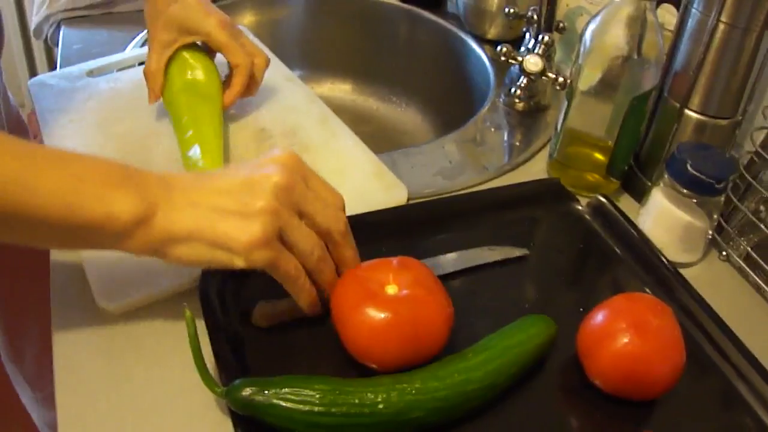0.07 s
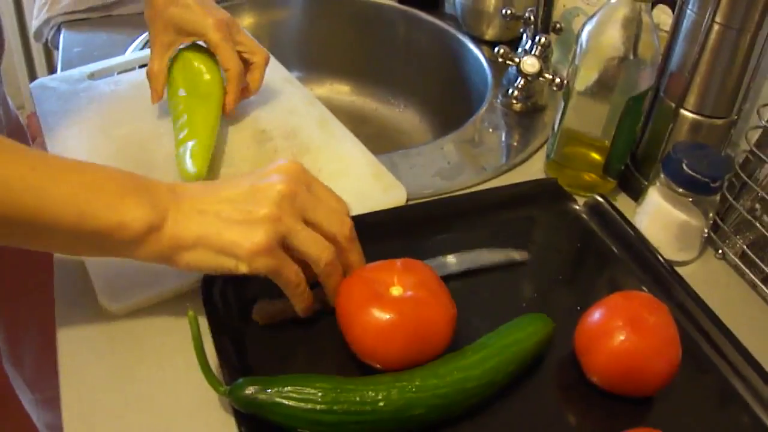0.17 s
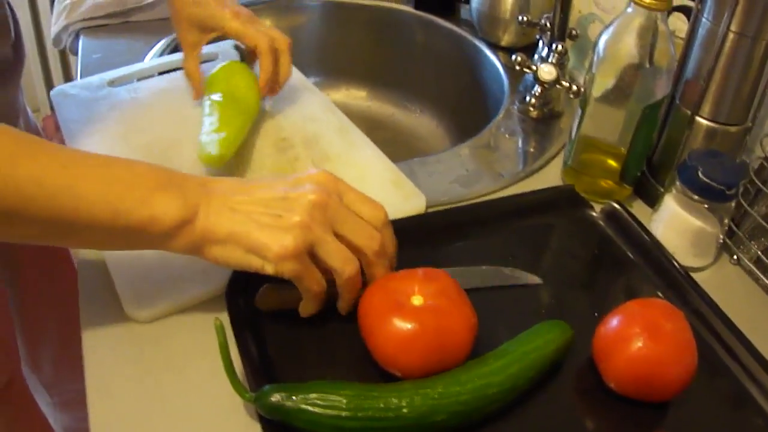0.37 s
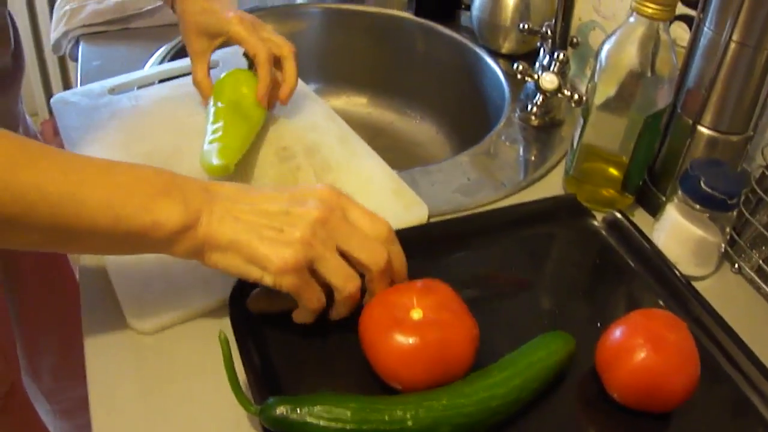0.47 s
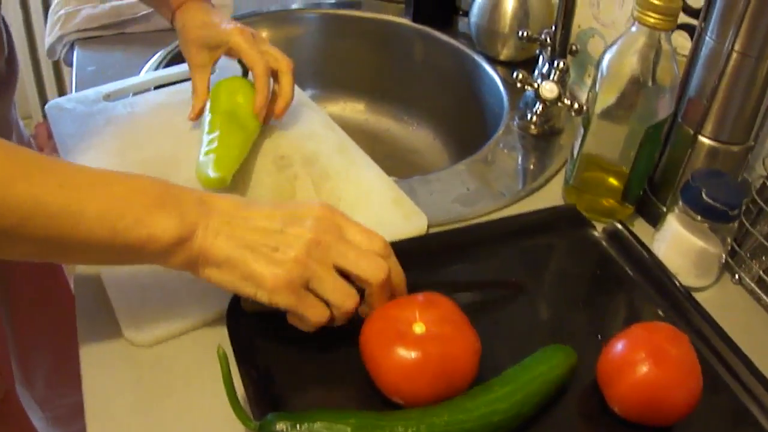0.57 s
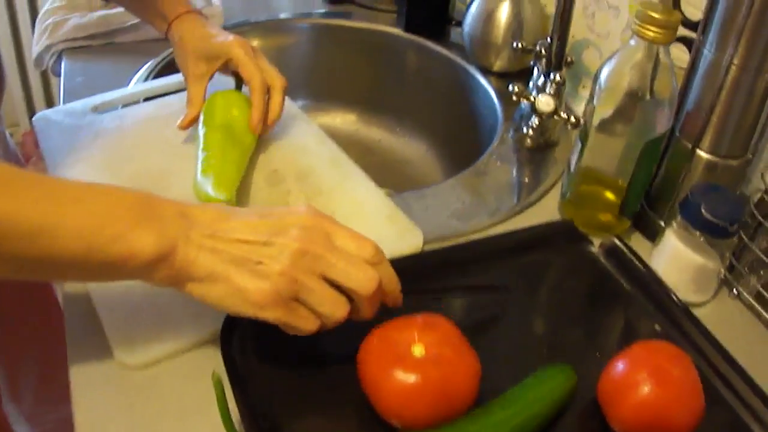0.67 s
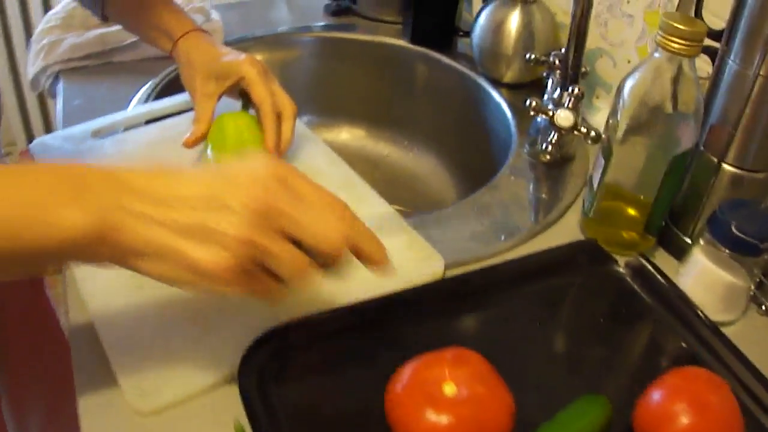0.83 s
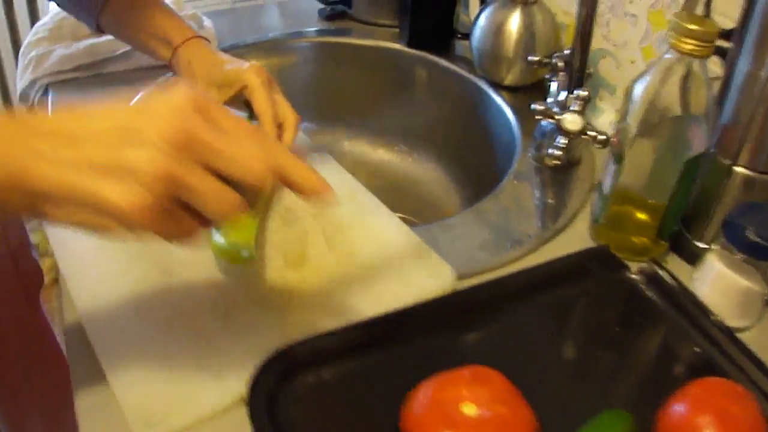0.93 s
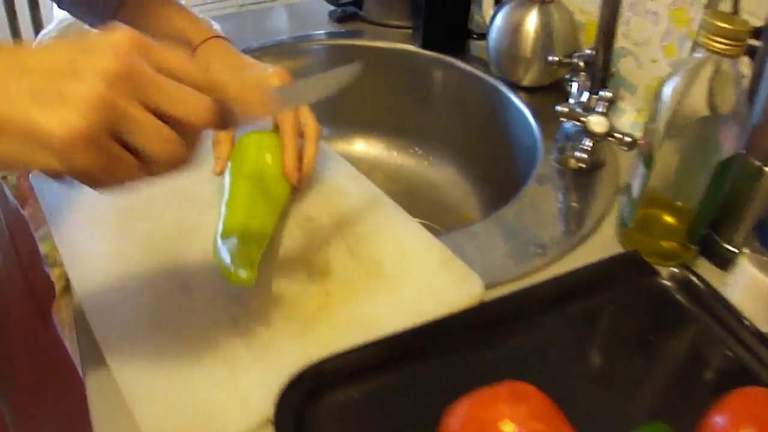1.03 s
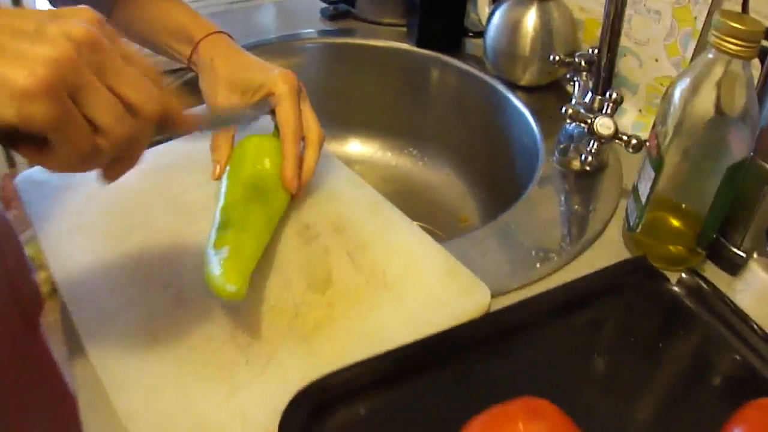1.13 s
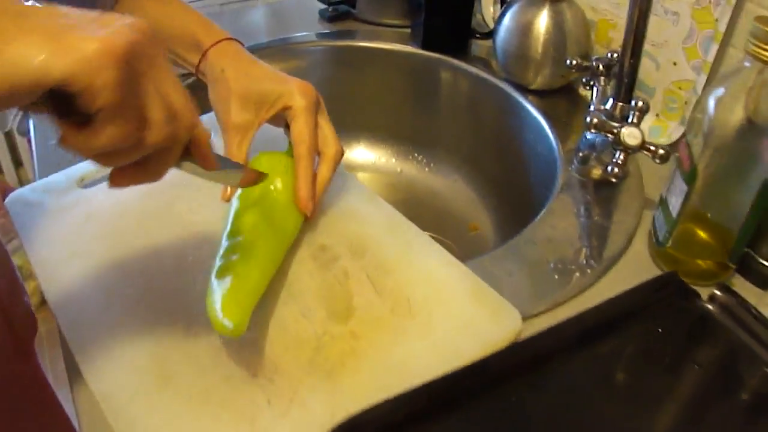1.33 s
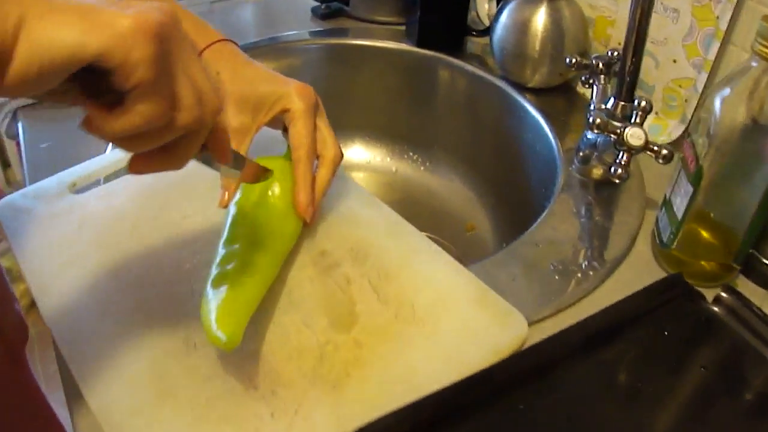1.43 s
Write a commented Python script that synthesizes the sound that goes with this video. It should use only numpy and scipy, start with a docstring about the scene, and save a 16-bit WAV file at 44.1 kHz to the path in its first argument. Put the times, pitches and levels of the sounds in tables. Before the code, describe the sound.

A small knife is picked up from a baking tray, close by in a quiet kitchen. The handle knocks, then the blade clinks, scrapes and rattles off the rim. A soft tap and a pepper sliding on a cutting board follow.

```python
"""A small kitchen knife is picked up from a baking tray, close by, in a quiet kitchen.
The hand bumps and rubs the tray; the handle knocks on it (0.24 s), skids and ticks.
The blade clinks (0.5 s), drags and squeaks by stick-slip, its ring changing as the grip closes,
then rattles off the rim (0.67-0.8 s). A soft tap (1.13 s) and a short slide of a pepper on the
cutting board follow. Steady air noise and faint appliance tones run throughout."""
import sys
import numpy as np
from scipy import signal
from scipy.fft import rfft, irfft
from scipy.io import wavfile
from scipy.ndimage import uniform_filter1d

SR = 44100
rng = np.random.default_rng(int(sys.argv[2]) if len(sys.argv) > 2 else 0)


def bounce(signal):
    """Save signal as a 16-bit WAV file at the path given by the first command-line argument."""
    frames = np.transpose(np.atleast_2d(signal))
    limited = np.clip(frames, -1, 1)
    pcm = np.round(limited * 32767).astype(np.int16)
    wavfile.write(sys.argv[1], SR, pcm)


N = 66150


def knife_handle():
    """Handle knocks ring the tray; the shifting handle ticks in its own modes."""
    # contacts (time [s], level [dB], tilt [dB/octave])
    knocks = [(.2322, -40.5, -2.5), (.2388, -15.5, -0.2), (.2408, -23, 2), (.2450, -32, -3)]
    ticks = [(.2836, -26.5, 3), (.2946, -40, 10.5), (.2963, -38, 10), (.3595, -35, 4), (.3622, -35.5, -1.5),
             (.3650, -37, 2.5)]
    # modes (frequency [Hz], level [dB], t60 [s])
    tray_modes = [(726, -6.5, 0.083), (866, -4, 0.047), (1250, -3, 0.025), (1667, -7, 0.1),
                  (2400, -7.5, 0.037), (2704, -2, 0.041), (3196, -0.5, 0.027), (3630, -2, 0.02),
                  (4380, -4, 0.005), (5680, -0.5, 0.017), (8400, -12, 0.011), (10550, -17, 0.013)]
    handle_modes = [(3270, 4, 0.016), (3588, 3.5, 0.048), (4040, -4, 0.0078), (5950, -11, 0.0096)]
    tray = body(tray_modes, crack_db=-6, crack_t60_s=0.037)
    handle = body(handle_modes, crack_db=2, crack_t60_s=0.023)
    return strike(knocks, tray) + strike(ticks, handle)


def knife_blade():
    """Contacts and friction ring the blade: loose, pinched in the fingers, then tip on the rim."""
    # modes per state (frequency [Hz], level [dB], t60 [s])
    loose_modes = [(950, -2.5, 0.011), (1488, 2, 0.097), (1707, 4, 0.077), (2483, -14, 0.081),
                   (2716, -7.5, 0.12), (3050, -9, 0.12), (3460, -7, .09), (3800, 6.5, 0.027),
                   (5530, -2.5, 0.052), (5862, 5, 0.028), (7250, -8.5, 0.072), (7740, -3, 0.035),
                   (8880, -4, 0.081), (9360, -3.5, 0.015)]
    pinched_modes = [(848, -16, 0.054), (1297, -10, .07), (1773, -5, 0.033), (2326, -4.5, 0.038),
                     (2472, -2, 0.029), (2740, -10.5, 0.049), (3210, -10.5, .04), (3380, -9.5, .06),
                     (3555, -5.5, 0.051), (4900, -6, 0.027), (5490, -7, 0.02), (8800, -14, 0.0045),
                     (10190, -14, 0.019)]
    tip_modes = [(770, -6.5, 0.016), (950, -5, 0.043), (1188, -9.5, 0.034), (1815, -8, .03),
                 (1945, -2.5, 0.04), (2234, -1, 0.029), (2370, -4.5, 0.04), (2638, 1, 0.03),
                 (2975, -1, 0.016), (3570, -5, 0.021), (4150, -11, 0.022), (4947, -6.5, 0.032),
                 (5440, -9, 0.025), (5930, -9.5, 0.0084)]
    # contacts (time [s], level [dB], tilt [dB/octave])
    clinks = [(.4950, -20, 2), (.4962, -25, 0.5), (.4995, -24, -2), (.5572, -34, 4.5)]
    rim_rattles = [(.6700, -34, 4), (.7203, -30, 3), (.7622, -29, -0.5), (.7703, -22, 2), (.7738, -34, -6),
                   (.7825, -25.5, -0.5)]
    # drags (start [s], peak [s], end [s], level [dB], tilt [dB/octave], state [0 loose, 1 pinched, 2 tip])
    strokes = [(0.534, 0.558, 0.6, -34, 1.5, 0), (0.557, 0.59, 0.62, -26.5, 2.5, 1),
               (0.589, 0.599, 0.626, -23.5, -3.5, 1), (0.643, 0.682, 0.807, -32, 5.5, 2),
               (0.667, 0.716, 0.798, -31, -2, 2), (0.74, .779, 0.8, -26, 5, 2)]
    loose = body(loose_modes, crack_db=-7, crack_t60_s=0.037)
    pinched = body(pinched_modes, crack_db=-8.5, crack_t60_s=0.011)
    tip = body(tip_modes, crack_db=-11, crack_t60_s=0.02)
    out = strike(clinks, loose) + strike(rim_rattles, tip)
    for start, peak, end, db, tilt_db, state in strokes:
        drag = tilt(friction(), tilt_db) * swell(start, peak, end, db)
        out += convolve(drag, (loose, pinched, tip)[state])
    return out


def blade_squeaks():
    """Stick-slip: the dragging blade locks onto one mode for a moment."""
    # (start [s], peak [s], end [s], level [dB], pitch [Hz])
    squeaks = [(0.552, 0.562, 0.57, -28.5, 5630), (0.552, 0.559, 0.564, -35, 9040),
               (0.578, 0.591, 0.61, -28.5, 2450), (0.661, 0.684, 0.686, -31, 4850),
               (0.688, 0.719, 0.756, -22.5, 2048), (0.763, 0.774, 0.782, -29, 1215),
               (0.568, .582, .605, -39.5, 10300), (0.705, 0.729, 0.754, -41, 515),
               (0.743, 0.766, 0.77, -40, 482)]
    pitch_waver, flutter_db = 0.003, 1.4
    out = np.zeros(N)
    for start, peak, end, db, hz in squeaks:
        phase = 2 * np.pi * np.cumsum(hz * (1 + pitch_waver * walk(160))) / SR
        gain = swell(start, peak, end, db) * undb(flutter_db * walk(250))
        out += np.sqrt(2) * np.sin(phase) * gain
    return out


def tray_rubbing():
    """Fingers and handle rub along the tray; the handle skids after its knock."""
    # (time [s], level [dB])
    rub_levels = [(0, -81), (.13, -55), (.23, -49.5), (.255, -39), (.31, -40.5), (.40, -41.5), (.48, -41),
                  (.63, -44.5), (.80, -47), (.88, -55)]
    # (start [s], peak [s], end [s], level [dB])
    skid_swell = (.244, 0.2652, 0.3245, -29)
    # spectra (frequency [Hz], gain [dB])
    rub_colour = [(60, -30), (200, -12.5), (600, 0.5), (1200, 1), (2200, -4.5), (3500, -4.5), (5000, -9),
                  (7000, -11.5), (11000, -19.5)]
    skid_colour = [(400, -16), (900, 0.5), (1500, -1), (2200, -3), (3500, -3), (4800, -13), (7000, -20),
                   (11000, -24)]
    rub = unit(colour(friction(), rub_colour)) * curve(rub_levels)
    skid = unit(colour(friction(), skid_colour)) * swell(*skid_swell)
    return rub + skid


def tray_rumble():
    """Friction under the hand drives the tray floor's low modes; soft bumps add dull thuds."""
    # swells (start [s], peak [s], end [s], level [dB])
    rumbles = [(0.23, 0.309, 0.4, -39), (0.575, 0.595, 0.63, -36), (0.609, 0.625, 0.63, -39),
               (0.627, 0.664, 0.725, -34.5)]
    bumps = [(0.054, 0.094, 0.23, -51.5), (0.178, 0.203, 0.245, -43), (0.612, 0.632, 0.72, -46.5)]
    # (frequency [Hz], level [dB], t60 [s])
    floor_modes = [(195, -9.5, 0.034), (299.8, 1, 0.1), (399, -2, 0.07), (544, -3, 0.04),
                   (772, -1.5, 0.066)]
    # (frequency [Hz], gain [dB])
    bump_colour = [(50, -26), (90, -14), (115, -2.5), (160, -24), (220, 1.5), (400, -24), (2000, -53)]
    drive = friction() * sum(swell(*row) for row in rumbles)
    rumble = convolve(drive, body(floor_modes, crack_db=-27, crack_t60_s=0.02))
    thuds = noise(bump_colour) * sum(swell(*row) for row in bumps)
    return rumble + thuds


def pepper_on_board():
    """A soft tap rings the cutting board; the pepper slides with a short hiss."""
    # (time [s], level [dB], tilt [dB/octave])
    taps = [(1.1285, -35, 1.5)]
    # (frequency [Hz], level [dB], t60 [s])
    board_modes = [(398, -3.5, 0.016), (824, -0.5, 0.03), (1050, -1, 0.018), (1228, 1, .04),
                   (2100, -9, .003)]
    # (time [s], level [dB])
    slide_levels = [(1.255, -58), (1.275, -44.5), (1.295, -43), (1.325, -44), (1.345, -51.5), (1.42, -60)]
    # (frequency [Hz], gain [dB])
    slide_colour = [(80, -30), (400, -7), (900, -16), (1250, 7), (1700, -16), (2350, 2.5), (2900, -7.5),
                    (3800, -5.5), (5000, -13.5), (6200, -9), (11000, -27)]
    board = body(board_modes, crack_db=-15.5, crack_t60_s=0.015)
    return strike(taps, board) + noise(slide_colour) * curve(slide_levels)


def kitchen_reverb(x):
    """Add the short reverberation of a small hard room."""
    # (frequency [Hz], gain [dB])
    tail_colour = [(100, -3), (1200, 1.5), (3000, -2.5), (6000, -8.5), (11000, -3.5)]
    t60_s, tail_db, delay_s = 0.22, -8.5, 0.009
    late_s = clock() - delay_s
    tail = colour(rng.standard_normal(N), tail_colour)
    decay = (late_s > 0) * np.exp(-np.log(1000) * np.abs(late_s) / t60_s)
    return x + undb(tail_db) * convolve(x, tail * unit(decay) / np.sqrt(N))


def room_noise():
    """Steady air noise with faint, wavering appliance tones."""
    # (frequency [Hz], gain [dB])
    air_colour = [(15, -67), (25, -40), (58, -21), (81, -11.5), (134, -9), (169, -3), (274, -3.5),
                  (311, -4), (433, -4), (721, -5), (1060, -5), (1950, -11), (2580, -13), (11000, -24.5),
                  (14300, -74), (22000, -120)]
    # (frequency [Hz], level [dB])
    appliance_tones = [(301.5, -59.5), (1244, -68), (7870, -67)]
    air_db, waver_rad = -47.5, 1.7
    hum = np.zeros(N)
    for hz, db in appliance_tones:
        hum += undb(db) * np.sqrt(2) * np.sin(2 * np.pi * hz * clock() + waver_rad * walk(32))
    return undb(air_db) * noise(air_colour) + hum


def body(modes, crack_db, crack_t60_s):
    """Impulse response, energy 1: ringing modes plus a short crack of dense high modes."""
    # (frequency [Hz], gain [dB])
    crack_colour = [(100, -23), (300, -10), (700, -2), (2000, 3), (3500, 7), (5800, 0), (7000, -3.5),
                    (11000, -10.5)]
    radiation_hz = 130  # small bodies radiate little below this
    t = clock()
    fade = lambda t60: np.exp(-np.log(1000) * t / t60) / np.sqrt(t60)
    ring = np.zeros(N)
    for k, (hz, db, t60) in enumerate(modes):
        ring += (-1) ** k * undb(db) * fade(t60) * np.sin(2 * np.pi * hz * t)
    ring = highpass(ring, radiation_hz)
    crack = noise(crack_colour) * fade(crack_t60_s)
    return unit(unit(ring) + undb(crack_db) * unit(crack)) / np.sqrt(N)


def strike(contacts, response, span_s=0.005):
    """Impulses ring a body; level is the rms over span_s, before tilt."""
    force = np.zeros(N)
    for at_s, db, tilt_db in contacts:
        push = np.zeros(N)
        push[int(at_s * SR)] = undb(db) * np.sqrt(span_s * SR)
        force += tilt(push, tilt_db)
    return convolve(force, response)


def friction(catches_per_s=3000, spread_db=1):
    """Dense, uneven little catches on the tray, rms 1."""
    catches = rng.random(N) < catches_per_s / SR
    sign = rng.choice([-1, 1], N)
    strength = undb(spread_db * np.minimum(rng.exponential(size=N), 4))
    return unit(catches * sign * strength)


def undb(db):
    return 10 ** (np.asarray(db) / 20)


def unit(x):
    """Scale to rms 1."""
    return x / np.sqrt(np.mean(x ** 2))


def clock():
    """Sample times [s]."""
    return np.arange(N) / SR


def colour(x, points):
    """Filter by (frequency [Hz], gain [dB]) points."""
    hz, db = np.array(points).T
    bins_hz = np.maximum(np.fft.rfftfreq(2 * N, 1 / SR), 1)
    gain = undb(np.interp(np.log(bins_hz), np.log(hz), db))
    return irfft(rfft(x, 2 * N) * gain)[:N]


def tilt(x, db_per_octave):
    """Slope the spectrum two octaves either side of 3200 Hz."""
    return colour(x, [(800, -2 * db_per_octave), (12800, 2 * db_per_octave)])


def noise(points):
    """Coloured noise, rms 1."""
    return unit(colour(rng.standard_normal(N), points))


def walk(rate_hz):
    """Smooth random wander, rms 1."""
    width = max(int(SR / rate_hz), 1)
    return unit(uniform_filter1d(uniform_filter1d(rng.standard_normal(N), width), width))


def curve(points):
    """Gain from (time [s], level [dB]) points, silent outside them."""
    return undb(np.interp(clock(), *np.array(points).T, left=-np.inf, right=-np.inf))


def swell(start_s, peak_s, end_s, db, edge_db=19):
    """Rise and fall, linear in dB; edge_db down at start and end."""
    t = clock()
    before = (peak_s - t) / max(peak_s - start_s, 1e-3)
    after = (t - peak_s) / max(end_s - peak_s, 1e-3)
    return undb(db - edge_db * np.maximum(before, after))


def convolve(x, response):
    return signal.fftconvolve(x, response)[:N]


def highpass(x, hz):
    return signal.sosfilt(signal.butter(2, hz, "highpass", fs=SR, output="sos"), x)


def scene():
    """Knife, tray and board in the kitchen, over room noise; mono."""
    knife = knife_handle() + knife_blade() + blade_squeaks()
    handling = tray_rubbing() + tray_rumble() + pepper_on_board()
    return (kitchen_reverb(knife + handling) + room_noise())[None]


def record(dry):
    """Thin the bass and cut the top."""
    low_cut_hz, top_hz = 61, 11000
    lowpass = signal.ellip(10, 0.2, 70, top_hz, fs=SR, output="sos")
    return signal.sosfilt(lowpass, highpass(dry, low_cut_hz))


dry = scene()
out = record(dry)
bounce(out)
```